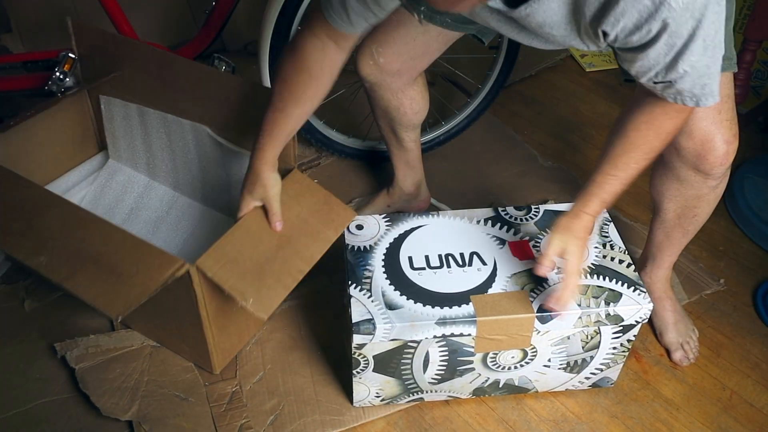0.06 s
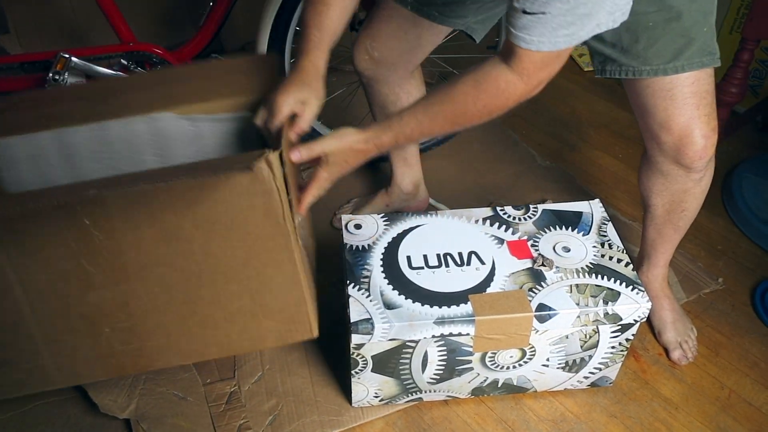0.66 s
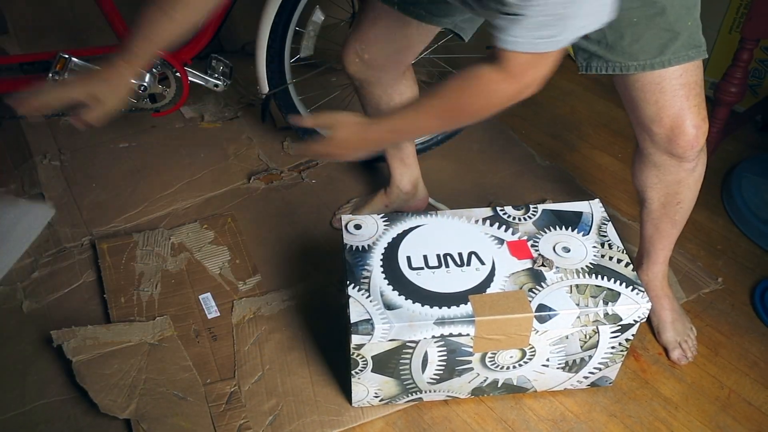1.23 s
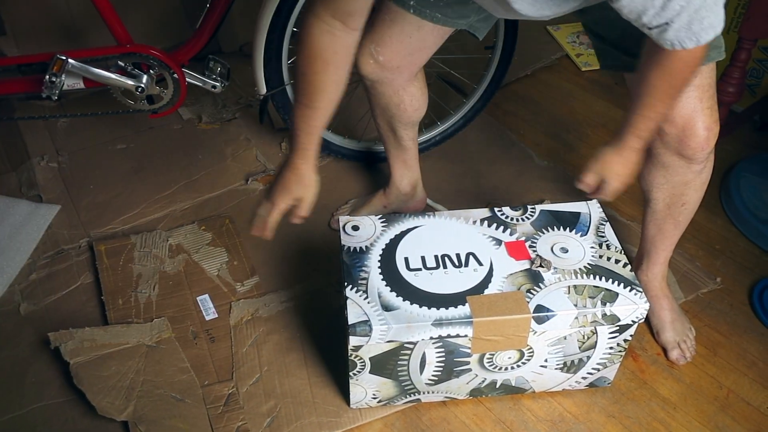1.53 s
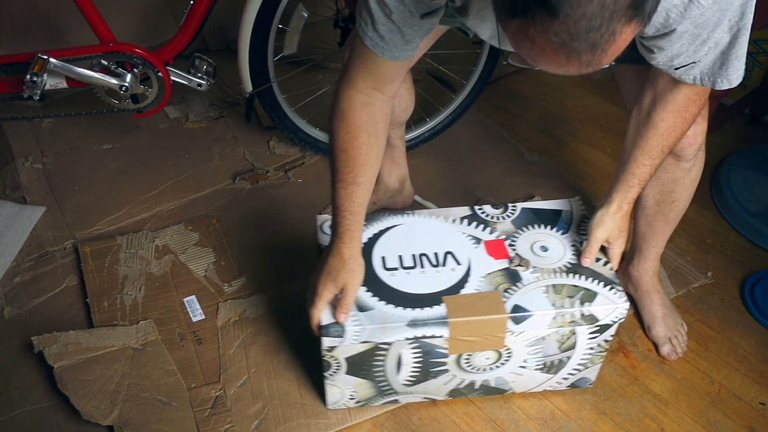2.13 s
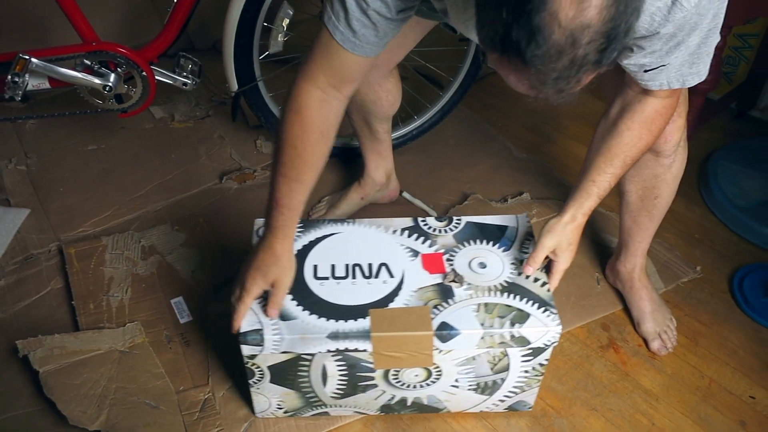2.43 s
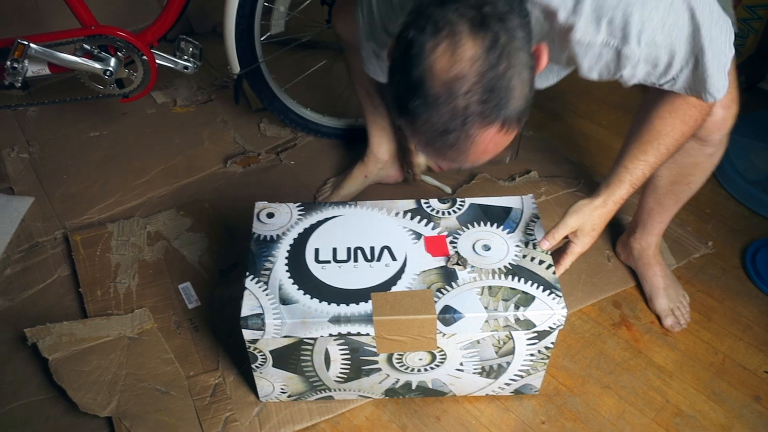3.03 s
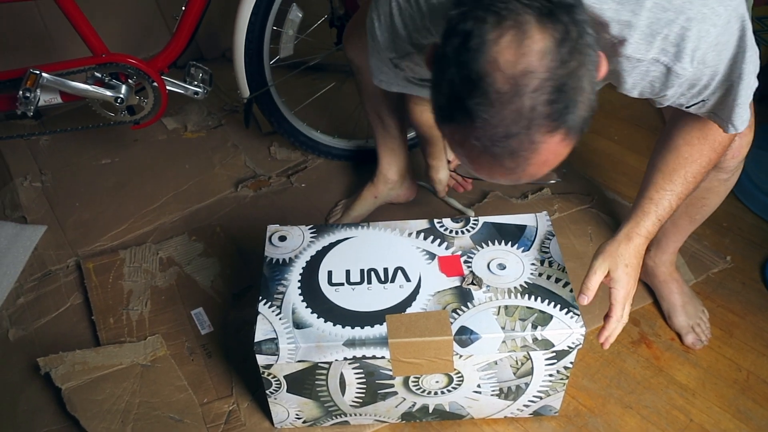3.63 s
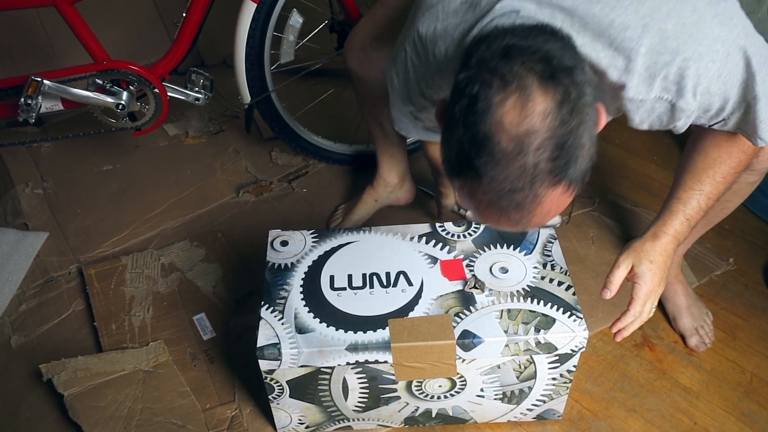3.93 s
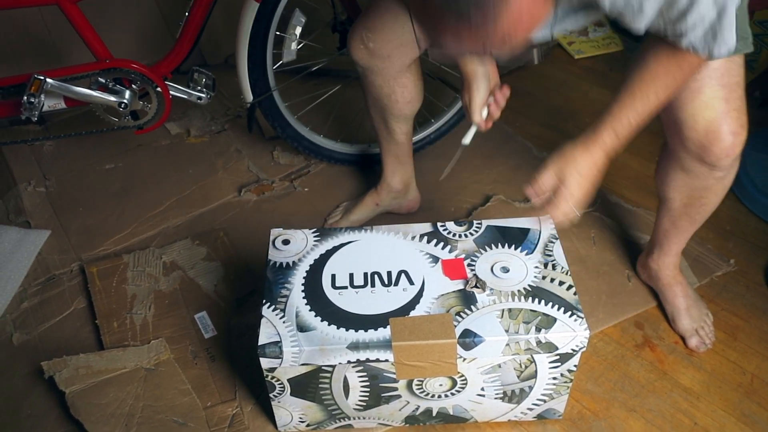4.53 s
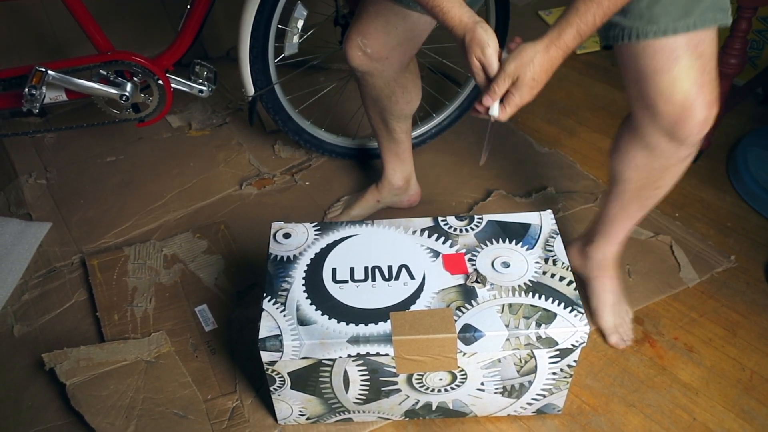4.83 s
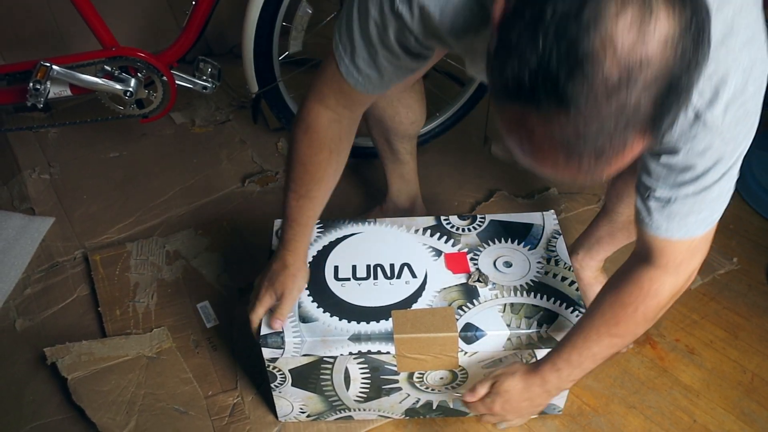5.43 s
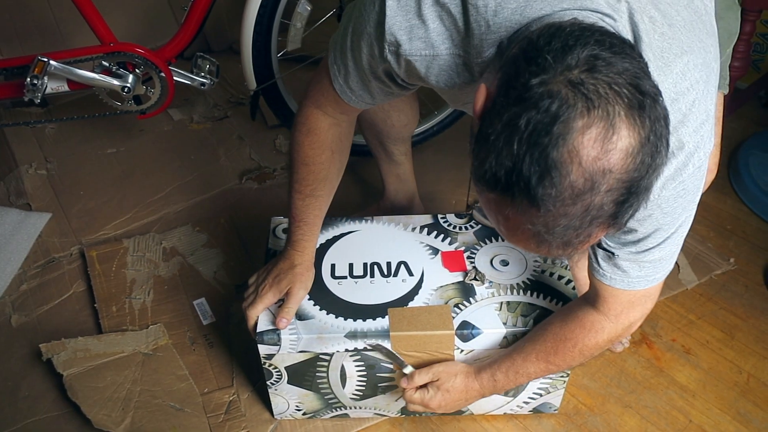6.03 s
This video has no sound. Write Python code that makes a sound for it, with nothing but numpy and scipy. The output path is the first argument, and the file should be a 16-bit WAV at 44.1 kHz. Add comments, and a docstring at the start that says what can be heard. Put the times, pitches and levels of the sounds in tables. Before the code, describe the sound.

In a small room, an empty cardboard carton is grabbed, dragged and tumbles to the floor with hollow, shuddering booms. A full box is bumped and slides over flattened cardboard. Fingers creak on it, then something is slapped down and rattles briefly. Feet shuffle and creases snap, and hands pat and rub the lid with a small squeak. The knocks sound close and ring briefly over a faint motor hum.

```python
"""Cardboard boxes in a small room.

An empty carton is grabbed, swung aside and tumbles to the floor, its walls booming and shuddering.
A full box slides over flattened board, fibres catching and slipping. Something is slapped down and
rattles, feet shuffle, creases snap and hands pat the lid. The room rings briefly after each knock;
two motors hum underneath."""
import sys
import numpy as np
from scipy import signal
from scipy.fft import rfft, irfft, next_fast_len
from scipy.io import wavfile
from scipy.ndimage import map_coordinates

SR = 44100
rng = np.random.default_rng(int(sys.argv[2]) if len(sys.argv) > 2 else 0)


def generate_wav(sig):
    """Save sig (samples, or channels by samples) to the path in sys.argv[1] as 16-bit PCM at SR."""
    pcm = np.round(np.clip(np.atleast_2d(sig).T, -1, 1) * 32767).astype(np.int16)
    wavfile.write(sys.argv[1], SR, pcm)


N = 276507
TIME = np.arange(N) / SR
RING_TIME = np.arange(SR * 3 // 5) / SR


def amp(db):
    """Decibels to gain."""
    return 10 ** (np.asarray(db) / 20)


def unit(x):
    """Scale to rms 1."""
    return x / np.sqrt(np.mean(x ** 2) + 1e-20)


def along(points, hz):
    """Read (freq_hz, value) points on a log frequency axis."""
    freqs_hz, values = np.transpose(points)
    return np.interp(np.log(hz + 1), np.log(freqs_hz + 1), values)


def wobble(knots_hz, t=TIME):
    """Smooth random curve over the times t."""
    return map_coordinates(rng.standard_normal(int(N * knots_hz / SR) + 4), [t * knots_hz])


def clicks(n, chance):
    """Random impulses, with this chance per sample."""
    return rng.standard_normal(n) * (rng.random(n) < chance)


def swell(start_s, length_s):
    """Half-sine rise and fall."""
    return np.sin(np.pi * np.clip((TIME - start_s) / length_s, 0, 1))


def gate(start_s, end_s):
    """1 between two times, with 30 ms ramps."""
    return np.clip(np.minimum(TIME - start_s, end_s - TIME) / .03 + .7, 0, 1)


def add(track, start_s, sound):
    """Mix a sound into the track."""
    part = track[:, max(round(start_s * SR), 0):][:, :sound.shape[-1]]
    part += sound[..., :part.shape[-1]]


def filtered(x, response):
    """Apply a complex frequency response."""
    n = x.shape[-1]
    size = 2 * next_fast_len(n // 2 + 4096)
    return irfft(rfft(x, size) * response(np.fft.rfftfreq(size, 1 / SR)), size)[..., :n]


def coloured(x, colour):
    """Filter by (freq_hz, gain_db) points."""
    return filtered(x, lambda hz: amp(along(colour, hz)))


def causal(gain):
    """Minimum-phase response with this gain."""
    cepstrum = irfft(np.log(np.maximum(gain, 1e-6)))
    half = len(cepstrum) // 2
    cepstrum[1:half] *= 2
    cepstrum[half + 1:] = 0
    return np.exp(rfft(cepstrum))


def bands(x, edges_hz):
    """Split into bands, low to high."""
    inner = [(pair, "band") for pair in zip(edges_hz, edges_hz[1:])]
    shapes = [(edges_hz[0], "low"), *inner, (edges_hz[-1], "high")]
    return [signal.sosfilt(signal.butter(4, hz, kind, fs=SR, output="sos"), x) for hz, kind in shapes]


# room decay: freq_hz, t60_s
ROOM_DECAY = [(100, 1), (250, 0.35), (700, 0.49), (2000, 0.54), (5000, 0.6), (12000, 0.24)]


def in_room(x, direct, early_db, early_t60_s):
    """Mono to mid and side: direct sound, near walls and a tail that decays by frequency."""
    hz, t, noise = signal.stft(rng.standard_normal((2, len(RING_TIME))), SR, nperseg=256)
    tail = amp(-60 * t / along(ROOM_DECAY, hz)[:, None])
    early = amp(early_db - 60 * t / early_t60_s)
    response = signal.istft(noise * (tail + early), SR, nperseg=256)[1]
    response /= np.linalg.norm(response[0])
    response[0, 0] += direct
    return signal.fftconvolve(x[None], response, axes=1)[:, :N]


# board contact spectrum: freq_hz, gain_db
CONTACT_COLOUR = [(40, -1), (110, 8), (170, 17), (900, 8), (2000, -3.5), (3300, -9), (5000, -19.5),
                  (8000, -24.5), (11500, -31), (13500, -41), (16000, -71)]
# crossovers between thump, ring, slap and crack: freq_hz
KNOCK_EDGES_HZ = [260, 600, 1600]


def knocks(blows, panels, balance_db, chatter_s, damped_db, **room):
    """A yielding contact and a chatter of flaps ring the panels and the room."""
    track, t, size = np.zeros((2, N)), RING_TIME, 2 ** 15
    hz = np.fft.rfftfreq(size, 1 / SR)
    ring_power = sum(np.abs(amp(db) * hz * width_hz / (pitch_hz ** 2 - hz ** 2 + 1j * hz * width_hz)) ** 2
                     for pitch_hz, width_hz, db in panels)
    board = causal(np.sqrt(ring_power + amp(damped_db) ** 2) * amp(along(CONTACT_COLOUR, hz)))
    for start_s, level_db, hardness_db, crack_db, give_s in blows:
        contacts = 0.19 * clicks(len(t), .009) * np.exp(-t / chatter_s)
        contacts[0] = 1
        build_up = np.clip((t + 1 / SR) / give_s, 0, 1)
        force = in_room(contacts, **room)[:, :len(t)] * build_up
        blow = irfft(rfft(force, size) * board)[:, :len(t)]
        # harder contact: less thump, more slap
        band_db = level_db + np.add(balance_db, [-hardness_db, 0, hardness_db, crack_db])
        for band, db in zip(bands(blow, KNOCK_EDGES_HZ), band_db):
            add(track, start_s - give_s / 2, band * amp(db) / np.std(band[0, :SR // 25]))
    return track


def friction(colour, slips_hz, rush, jerk_db, effort=1):
    """Fibres catch and slip: uneven clicks over a fine rush."""
    slips = unit(clicks(N, slips_hz / SR))
    grit = (slips + rush * rng.standard_normal(N)) * amp(jerk_db * wobble(45)) * effort
    # the contact wanders between four spots, each with its own echoes
    spots = np.array([wobble(25) for _ in range(4)])
    spots /= np.linalg.norm(spots, axis=0)
    heard = sum(in_room(grit * spot, direct=.45, early_db=4, early_t60_s=.09) for spot in spots)
    return coloured(heard, colour)


# crossovers between rumble, rasp and hiss: freq_hz
RUB_EDGES_HZ = [500, 2500]


def stroke(gains, colour, **texture):
    """Friction whose rumble, rasp and hiss follow three gains."""
    parts = bands(friction(colour, **texture), RUB_EDGES_HZ)
    return sum(part / np.std(part[0]) * gain for part, gain in zip(parts, gains))


def rub_gains(rubs, rumble_db, hiss_db):
    """Each rub swells and fades; brighter ones have more hiss and less rumble."""
    rise_share, fall_share, roundness = 0.84, 0.7, 1.75
    power = np.zeros((3, N))
    for peak_s, length_s, db, bright_db in rubs:
        from_peak = np.maximum((peak_s - TIME) / rise_share, (TIME - peak_s) / fall_share) / length_s
        envelope = np.exp(-np.minimum(from_peak ** roundness, 20))
        gains = amp([db + rumble_db - bright_db, db, db + hiss_db + bright_db])
        power += np.outer(gains, envelope) ** 2
    return np.sqrt(power)


def snaps(events, colour, shelf_hz, breaks_hz, spray, direct, ring_hz):
    """Strained board gives: one sharp break, then a spray of small ones; each patch has its own ring."""
    ring_db, width_oct, spread_oct = 10, 0.039, 0.454
    track, t = np.zeros((2, N)), np.arange(SR // 10) / SR
    for start_s, level_db, spray_s, treble_db in events:
        breaks = spray * clicks(len(t), breaks_hz / SR) * np.exp(-t / spray_s)
        breaks[0] = 1
        pitches_hz = ring_hz * 2 ** (spread_oct * rng.standard_normal((3, 1)))

        def patch(hz):
            peaks_db = ring_db * np.exp(-(np.log2((hz + 1) / pitches_hz) / width_oct) ** 2).max(axis=0)
            shelf_db = treble_db * hz ** 2 / (hz ** 2 + shelf_hz ** 2)
            return causal(amp(along(colour, hz) + peaks_db + shelf_db))

        snap = filtered(in_room(breaks, direct, early_db=4.5, early_t60_s=0.14), patch)
        add(track, start_s, snap * amp(level_db) / np.std(snap[0, :SR // 25]))
    return track


# blows on the carton: start_s, level_db, hardness_db, crack_db, give_s
CARTON_KNOCKS = [(.088, -37, -1.5, -17.5, 0.017), (.124, -20.5, 4, -30.5, 0.00025),
                 (0.157, -32.5, 3, -31, 0.0022), (.267, -26.5, 10, -17, 0.0039),
                 (.283, -31, 8, -17, 0.00097), (0.308, -35.5, -1.5, -18, 0.0036),
                 (.523, -35, 0, -13.5, 0.012), (0.57, -34, 2, -28, 0.0083), (.648, -41.5, -8, -20, 0.0047),
                 (.681, -32.5, -4, -21, 0.00087), (.911, -38.5, 1, -16, 0.0004), (1.119, -21, 0, -14, .003),
                 (1.136, -23.5, 1.5, -11.5, 0.0046), (1.18, -27, 3, -21, 0.00202),
                 (1.2984, -19, 2, -19.5, 0.0002), (1.327, -29, -5, -13.5, 0.002),
                 (1.424, -22.5, 4, -14.5, .008), (1.457, -23.5, 0, -15.5, .005),
                 (1.568, -26.5, 5.5, -17, 0.0034), (1.596, -33.5, -5, -12.5, 0.004)]
# panel resonances: pitch_hz, width_hz, level_db
CARTON_PANELS = [(54, 32, -6), (85, 14, -2), (102, 33, -1), (126, 22, -20), (177.6, 67, -1.5),
                 (271, 17, -1), (275, 6.1, -10), (333, 54, -6), (373.5, 30, 4.5), (435.4, 43, 2.5),
                 (470, 69, -1.5), (606, 13, -19), (655, 160, -3), (760, 95, -1), (865, 95, 4.5),
                 (1100, 85, -3), (1440, 200, -49)]
# drag envelope: time_s, level_db
DRAG_LEVELS = [(0.091, -50.5), (.24, -39), (.38, -45.5), (0.479, -43.5), (0.571, -42.5), (.73, -43.5),
               (.87, -50), (.98, -41.5), (1.1, -37), (1.2, -40), (1.55, -45), (1.68, -44.5), (1.859, -62),
               (1.95, -60)]
# rubbed cardboard spectrum: freq_hz, gain_db
DRAG_COLOUR = [(59, -25), (100, -3.5), (159, 2.5), (181, 11), (233, 4), (287, 9.5), (467, -12.5),
               (668, -20.5), (1130, -25.5), (2370, -39.5), (8410, -59), (11800, -60.5), (15500, -76)]


def empty_carton():
    """The carton is knocked about and rasps as it drags; its loose walls shudder after each blow."""
    blows = knocks(CARTON_KNOCKS, CARTON_PANELS, balance_db=[-0.5, -2.5, -10.5, -0.8], chatter_s=0.026,
                   damped_db=-15.5, direct=1.0, early_db=-1.0, early_t60_s=0.13)
    times_s, drag_db = np.transpose(DRAG_LEVELS)
    rasp = amp(np.interp(TIME, times_s, drag_db)) * gate(times_s[0], times_s[-1])
    shudder_db, fall_db_per_s, rise_s = -1, 92.5, 0.032
    shudder = np.zeros(N)
    for start_s, level_db, hardness_db, *_ in CARTON_KNOCKS:
        age_s = np.maximum(TIME - start_s, 0)
        decay = amp(level_db - hardness_db + shudder_db - fall_db_per_s * age_s)
        shudder = np.hypot(shudder, decay * np.minimum(age_s / rise_s, 1))
    gains = [shudder, rasp, rasp * amp(-17.5)]
    return blows + stroke(gains, DRAG_COLOUR, slips_hz=594, rush=0.57, jerk_db=1.5)


# struck walls of carton and box: start_s, pitch_hz, level_db, t60_s
WALL_BOOMS = [(0.091, 242.5, -27, 0.35), (.126, 187.2, -18, .3), (.126, 444, -18, 0.2),
              (0.268, 105, -22.5, 0.31), (.28, 173.5, -20.5, 0.31), (.565, 312, -28, 0.28),
              (0.642, 299.4, -19.5, 0.2), (.65, 152, -18, 0.28), (.683, 173, -17.5, 0.31),
              (1.115, 357.3, -11.5, 0.17), (1.12, 163.7, -23, 0.53), (1.137, 195.3, -12.5, 0.45),
              (1.14, 273, -15, .33), (1.135, 665, -22.5, 0.29), (1.118, 416, -16, 0.19),
              (1.165, 427, -18, 0.24), (1.299, 582, -14, .12), (1.303, 249, -12, 0.19),
              (1.307, 182, -14, 0.21), (1.325, 282, -16.5, 0.23), (1.382, 175.5, -14, 0.3),
              (1.424, 323.3, -13, 0.34), (1.432, 395, -16, 0.22), (1.455, 431, -19.5, 0.44),
              (1.445, 365, -17, 0.44), (1.46, 295, -18.5, 0.42), (1.588, 201.8, -17.5, 0.35),
              (1.589, 106, -24, 0.23), (1.67, 425, -35.5, 0.58), (1.995, 181.5, -28.5, 0.28),
              (2.065, 151.5, -22.5, 0.34), (2.078, 301, -22.5, 0.16), (2.109, 182, -35, 0.61)]


def wall_booms():
    """A wall bulges and rings one hollow note, set by where it is struck and wandering as it flexes."""
    rise_s, wander_share = 0.0029, 0.027
    track, t = np.zeros((2, N)), RING_TIME
    for start_s, pitch_hz, level_db, t60_s in WALL_BOOMS:
        phase = 2 * np.pi * np.cumsum(pitch_hz * (1 + wander_share * wobble(62.6, t))) / SR
        envelope = amp(level_db - 60 * t / t60_s) * (1 - np.exp(-t / rise_s))
        add(track, start_s, envelope * np.array([np.sin(phase), np.cos(phase)]))
    return track


# pats, bumps and nearby heels: start_s, level_db, hardness_db, crack_db, give_s
BOX_KNOCKS = [(2.0, -47, -12, -27, 0.002), (2.067, -36, -9, -20, 0.0021), (4.435, -48.5, -9.5, 5.5, 0.013),
              (4.728, -40, 0, -30, 0.0011), (5.029, -50.5, -10, -18, 0.0082),
              (5.523, -31.5, 1.5, -20.5, 0.0011), (5.546, -35, -3, -25, 0.0021),
              (5.821, -28, 7, -29, 0.0003), (5.839, -33.5, 4.5, -23, 0.0012), (5.974, -38, 7.5, -19, 0.003),
              (6.209, -36, -3, -24, 0.0037)]
# panel resonances: pitch_hz, width_hz, level_db
BOX_PANELS = [(95, 24, 2), (169.7, 20.5, 7), (263.5, 6.8, 3), (360, 50, 0.5), (500, 42, -25),
              (883, 140, 3.5), (1580, 71, -23), (1690, 80, -18), (2520, 117, -1), (3000, 920, -13)]
# slide envelope: time_s, level_db, treble_db
SLIDE_LEVELS = [(1.991, -51, -20), (2.136, -52, -11.5), (2.152, -48, -7), (2.33, -47, 0.5),
                (2.41, -42.5, -5), (2.5, -41.5, -7.5), (2.59, -45.5, -7.5), (2.66, -53, -13.5),
                (2.77, -65, -11), (2.88, -74, -2)]
# slide spectrum: freq_hz, gain_db
SLIDE_COLOUR = [(70, -12), (170, 9), (290, 5.5), (430, -1), (600, -7.5), (750, -3.5), (900, -10),
                (1400, -11), (3200, -21), (5000, -26.5), (8800, -35), (12500, -33.5), (15500, -48)]
# palms on the lid: peak_s, length_s, level_db, bright_db
PALM_RUBS = [(5.62, 0.36, -65, 13.5), (5.91, 0.073, -56.5, -14.5), (6.1, 0.18, -50, 0.5),
             (6.26, 0.075, -37.5, 5.5)]


def full_box():
    """The full box is bumped, pushed over the board, then patted and stroked."""
    blows = knocks(BOX_KNOCKS, BOX_PANELS, balance_db=[-5.5, -4.0, -30, -10.5], chatter_s=0.02,
                   damped_db=-11.0, direct=0.3, early_db=10.5, early_t60_s=0.16)
    times_s, *curves = np.transpose(SLIDE_LEVELS)
    db, treble_db = (np.interp(TIME, times_s, curve) for curve in curves)
    push = amp([db + 1.0, db - 0.6, db + treble_db - .3]) * gate(times_s[0], times_s[-1])
    slide = stroke(push, SLIDE_COLOUR, slips_hz=1460, rush=0.64, jerk_db=-1.05)
    palms = rub_gains(PALM_RUBS, rumble_db=4.5, hiss_db=-19.5)
    return blows + slide + stroke(palms, DRAG_COLOUR, slips_hz=1580, rush=1.0, jerk_db=1.5)


# blows on the flattened board: start_s, level_db, hardness_db, crack_db, give_s
BOARD_KNOCKS = [(1.957, -50, 8, -4, 0.0017), (3.175, -48, 3, -8, 0.0024), (3.235, -51, 1, 0.5, 0.0056),
                (3.387, -47.5, 3.5, -18, 0.00051), (3.504, -44, 4.5, -4, 0.00046),
                (3.572, -31, 3.5, -9, 0.00296), (3.635, -41.5, -3, -10, 0.0049),
                (4.073, -51, -3, 8.5, 0.0023), (4.15, -41.5, 1.5, -16, 0.00092),
                (4.2, -60, -9, -10, 0.0039), (4.302, -48, 5.5, -0.5, 0.0088), (4.681, -62.5, -6, 9, 0.0039),
                (4.912, -45.5, 1.5, -27, 0.00087)]
# board resonances: pitch_hz, width_hz, level_db
BOARD_PANELS = [(176.6, 11, -2), (274, 140, -16), (414, 48, 11.5), (895, 180, 1), (1120, 200, 2),
                (1360, 120, 2.5), (1550, 130, 2), (1815, 80, 5), (2270, 110, -6), (2370, 80, 8),
                (2700, 280, 3), (3220, 130, 2), (3840, 410, -1.5)]


def board_taps():
    """Taps and a slap ring the flattened board on the floor."""
    return knocks(BOARD_KNOCKS, BOARD_PANELS, balance_db=[0.5, -0.7, -7.0, -1.0], chatter_s=0.06,
                  damped_db=-14, direct=1.0, early_db=7.5, early_t60_s=0.17)


# contacts of the settling object: start_s, level_db
RATTLE_HITS = [(3.572, -32), (3.586, -30), (3.642, -40.5), (3.677, -44.5)]
# its modes: pitch_hz, level_db, t60_s
RATTLE_MODES = [(261.5, 5, .25), (382, 4.5, 0.27), (902, 2.5, 0.11), (1100, -4, .14), (1426, -1.5, 0.34),
                (1540, -1.5, 0.34), (1837, -9, 0.48), (2295, -2.5, 0.28), (2650, -5, 0.26),
                (3185, -1.5, .18), (3690, -8.5, .16)]


def rattle():
    """The slapped-down object settles; each contact rings its modes anew."""
    track, t = np.zeros((2, N)), RING_TIME
    attack = 1 - np.exp(-t / 0.00072)
    for start_s, hit_db in RATTLE_HITS:
        for pitch_hz, mode_db, t60_s in RATTLE_MODES:
            phase = 2 * np.pi * (pitch_hz * t + rng.random((2, 1))) + 0.92 * wobble(113, t)
            decay = amp(hit_db + mode_db + rng.normal(0, 3.0) - 60 * t / t60_s)
            add(track, start_s, decay * attack * np.sin(phase))
    return track


# creases giving: start_s, level_db, spray_s, treble_db
CREASE_SNAPS = [(3.121, -48.5, 0.003, -57), (3.168, -46, 0.0034, -30), (3.388, -48.5, 0.0041, -4),
                (3.505, -45, 0.0064, -24.5), (3.574, -35, 0.0043, -7), (3.586, -32.5, .002, -12.5),
                (3.6, -33.5, 0.0017, -20), (3.613, -36.5, 0.0013, -19), (3.644, -35, 0.0027, -24),
                (3.678, -41, 0.0015, -22), (4.074, -47.5, 0.008, -1.5), (4.149, -39.5, 0.013, 3),
                (4.166, -43.5, 0.0084, 18.5), (4.181, -42.5, 0.006, 16), (4.201, -43.5, 0.0058, 2),
                (4.327, -46, 0.0078, 2), (4.914, -47, 0.014, 8.5)]
# snap spectrum: freq_hz, gain_db
CREASE_COLOUR = [(150, -14), (500, 2.5), (1100, 5), (2400, 4.5), (3600, 1.5), (5000, -9), (9000, -18.5),
                 (13000, -21), (15500, -36)]


def creases():
    """Creases snap in the flattened board."""
    return snaps(CREASE_SNAPS, CREASE_COLOUR,
                 shelf_hz=4400, breaks_hz=716, spray=0.79, direct=0.51, ring_hz=1900)


# finger creaks: start_s, level_db, spray_s, treble_db
GRIP_CREAKS = [(2.907, -49, 0.019, -3), (2.985, -53, 0.025, 5), (3.007, -47, 0.028, 9),
               (3.04, -41, 0.003, 5), (3.057, -40.5, 0.0024, 6), (4.729, -43, 0.0045, -11),
               (4.81, -48, 0.038, -4), (6.213, -40, 0.11, 6.5)]
# creak spectrum: freq_hz, gain_db
GRIP_COLOUR = [(100, -2.5), (500, 5.5), (900, 1.5), (1350, -5.5), (1800, -17), (2600, -40), (6000, -61),
               (15500, -64)]


def grips():
    """Fingers creak as they grip the box."""
    return snaps(GRIP_CREAKS, GRIP_COLOUR,
                 shelf_hz=1200, breaks_hz=402, spray=1.0, direct=0.77, ring_hz=794)


# flap ticks: start_s, level_db, spray_s, treble_db
FLAP_FLICKS = [(.092, -63, 0.025, 17), (.269, -57.5, .008, 0), (.484, -59, .006, -11),
               (.548, -61, 0.019, -11), (.641, -65, .003, -2), (.649, -60.5, .012, 2)]
# tick spectrum: freq_hz, gain_db
FLAP_COLOUR = [(500, -28), (2500, -5), (4300, 5), (6500, -4.5), (9000, -3.5), (14000, -4), (15500, -11)]


def flaps():
    """The carton's flaps flick past each other."""
    return snaps(FLAP_FLICKS, FLAP_COLOUR,
                 shelf_hz=8000, breaks_hz=493, spray=0.93, direct=.45, ring_hz=5020)


# feet and knees shifting: peak_s, length_s, level_db, bright_db
SHUFFLES = [(3.24, 0.12, -51.5, -1.5), (3.45, 0.14, -49.5, 3), (3.82, 0.21, -59, 0.5),
            (4.19, 0.13, -45.5, 4), (4.33, 0.055, -51.5, 7), (4.48, 0.17, -54.5, 6.5),
            (4.8, 0.19, -56, -0.5), (5.08, 0.093, -53, -1.5)]
# shuffle spectrum: freq_hz, gain_db
SHUFFLE_COLOUR = [(65, -31), (110, -1), (166, 2), (279, 2.5), (431, -9), (613, -14), (1490, -18.5),
                  (2120, -24.5), (3150, -25.5), (8500, -40), (10700, -42.5), (14300, -50), (15500, -64)]
# bare sole sweeping: peak_s, length_s, level_db, bright_db
SOLE_SWEEPS = [(5.185, 0.033, -50, 8), (5.223, 0.054, -49, 12), (5.265, 0.14, -48.5, -0.5)]
# sweep spectrum: freq_hz, gain_db
SOLE_COLOUR = [(80, -22), (160, -25), (280, -12), (450, -21), (960, -2.5), (1400, 4), (2400, 3.5),
               (3400, 5), (6000, -2), (13000, -7), (15500, -39)]


def feet():
    """Feet shuffle and sweep on the flattened board while clothes rustle faintly."""
    cloth = amp([[-55.5], [-63.5], [-80]]) * gate(start_s=2.6, end_s=6.1)
    shuffle = np.hypot(rub_gains(SHUFFLES, rumble_db=5.0, hiss_db=-12.5), cloth)
    sweep = rub_gains(SOLE_SWEEPS, rumble_db=-8.5, hiss_db=-4.0)
    return (stroke(shuffle, SHUFFLE_COLOUR, slips_hz=605, rush=0.88, jerk_db=0.0)
            + stroke(sweep, SOLE_COLOUR, slips_hz=2830, rush=0.76, jerk_db=2.0))


# short brushes: start_s, length_s, level_db
SCUFFS = [(0.95, 0.059, -48.5), (1.036, 0.11, -47.5), (1.112, 0.028, -37.5), (3.176, 0.12, -53),
          (4.283, 0.033, -53.5), (4.8, 0.21, -54.5), (6.216, 0.15, -51)]


def scuffs():
    """Board brushes quickly and lightly on board."""
    effort = sum(amp(db) * swell(start_s, length_s) for start_s, length_s, db in SCUFFS)
    colour = [(300, -43), (1500, 11), (3200, 7), (6000, -5), (12000, -8), (15500, -20)]
    grit = friction(colour, slips_hz=826, rush=0.19, jerk_db=-4.0, effort=effort)
    return grit / np.std(grit[0]) * np.std(effort)


# skin and board squeaks: start_s, length_s, pitch_hz, level_db, jitter_share
SQUEAKS = [(0.263, 0.026, 1694, -35.5, .06), (0.317, 0.014, 860, -25, .08), (2.944, 0.019, 830, -38, .07),
           (6.077, 0.03, 775, -38, .08), (6.21, 0.15, 521, -34, .17)]


def squeaks():
    """Fingers and flaps stick and slip on the board at an unsteady rate."""
    tones = np.zeros(N)
    for start_s, length_s, pitch_hz, level_db, jitter_share in SQUEAKS:
        phase = 2 * np.pi * np.cumsum(pitch_hz * (1 + jitter_share * wobble(350))) / SR
        tones += amp(level_db) * swell(start_s, length_s) * (np.sin(phase) + 0.043 * np.sin(2 * phase))
    return in_room(tones, direct=0.43, early_db=35, early_t60_s=0.026)


# steel ring: start_s, pitch_hz, level_db, t60_s
TOOL_CLINK = [(5.824, 3660, -51, 0.028)]


def clink():
    """A small steel tool meets the lid and rings briefly."""
    track, t = np.zeros((2, N)), np.arange(SR // 4) / SR
    for start_s, pitch_hz, level_db, t60_s in TOOL_CLINK:
        ring = amp(level_db - 60 * t / t60_s) * np.sin(2 * np.pi * pitch_hz * t)
        add(track, start_s, np.outer([1, .5], ring))
    return track


# near and far motor: pitch_hz
MOTORS_HZ = [57.3, 58.8]
# room air spectrum: freq_hz, gain_db
AIR_COLOUR = [(30, 23), (60, 7), (100, 6), (250, 14.5), (700, -3), (2000, -15), (6000, -29), (15000, -60.5)]


def motors_and_air():
    """Two motors beat against each other in still room air."""
    in_step_s, fade_in_s = 2.72, .2
    air = amp(-62) * unit(coloured(rng.standard_normal((2, N)), AIR_COLOUR))
    near, far = (np.sin(2 * np.pi * hz * (TIME - in_step_s)) for hz in MOTORS_HZ)
    hum = (near + .55 * far) * np.clip(TIME / fade_in_s, 0, 1)
    return air + amp([[-54.5], [-58]]) * hum


# noise floor spectrum: freq_hz, gain_db
NOISE_COLOUR = [(60, -33), (130, -13), (220, 0), (400, 0), (900, -6), (1600, -14.5), (4000, -24.5),
                (15000, -47.5)]


def noise_floor():
    """A soft rush, independent in left and right."""
    rush = unit(coloured(rng.standard_normal((2, N)), NOISE_COLOUR))
    return amp(-57) * rush * gate(start_s=.09, end_s=np.inf)


# stereo width: freq_hz, side_gain_db
STEREO_WIDTH = [(60, -34.5), (125, -44.5), (250, -28.5), (500, -24.5), (1000, -14.5), (2300, -10),
                (4400, -3), (8000, 3.5), (13000, 9)]


def scene():
    """Mix as mid and side, near mono in the bass and wide in the treble; return left and right."""
    board = board_taps() + rattle() + creases()
    boxes = grips() + flaps() + empty_carton() + full_box() + wall_booms()
    mid, side = board + boxes + feet() + scuffs() + squeaks() + clink() + motors_and_air()
    side = filtered(side, lambda hz: causal(amp(along(STEREO_WIDTH, hz))))
    side -= 0.063 * board[0]  # the flattened board lies slightly right
    return np.array([mid + side, mid - side]) + noise_floor()


def record(dry):
    """Fade the end; cut the deepest bass and the top treble."""
    fade_s, low_hz, top_hz = .005, 42, 15600
    faded = dry * np.clip((TIME[-1] - TIME) / fade_s, 0, 1)
    return filtered(faded, lambda hz: (hz < top_hz) * causal(1 / np.sqrt(1 + (low_hz / (hz + 1)) ** 8)))


dry = scene()
out = record(dry)
generate_wav(out)
```